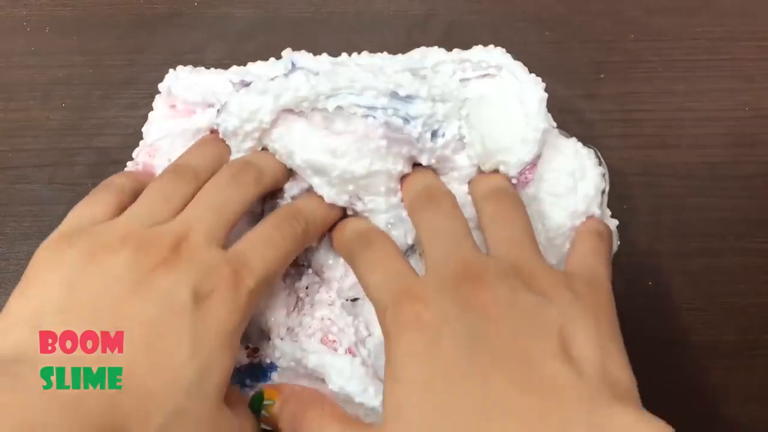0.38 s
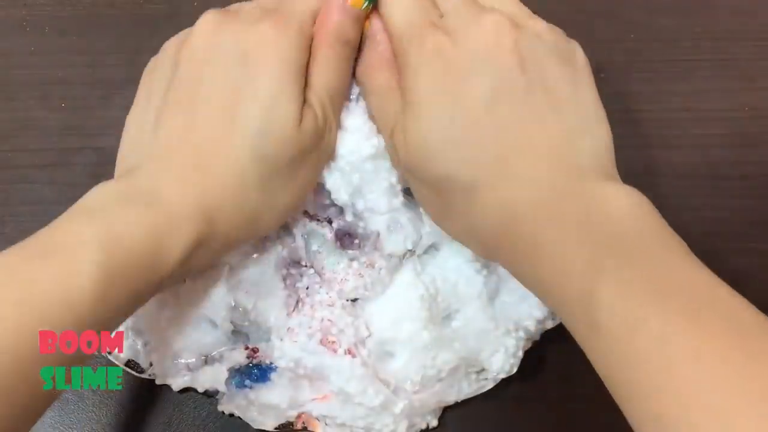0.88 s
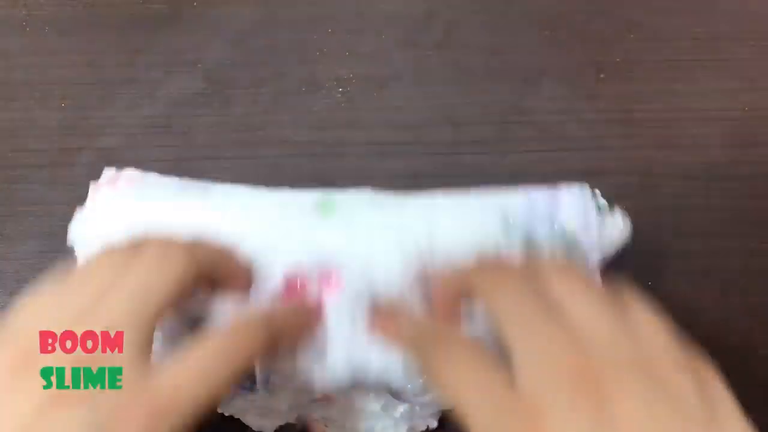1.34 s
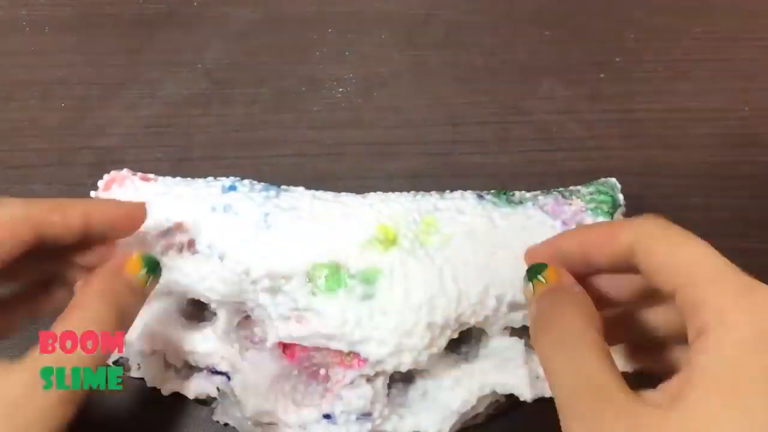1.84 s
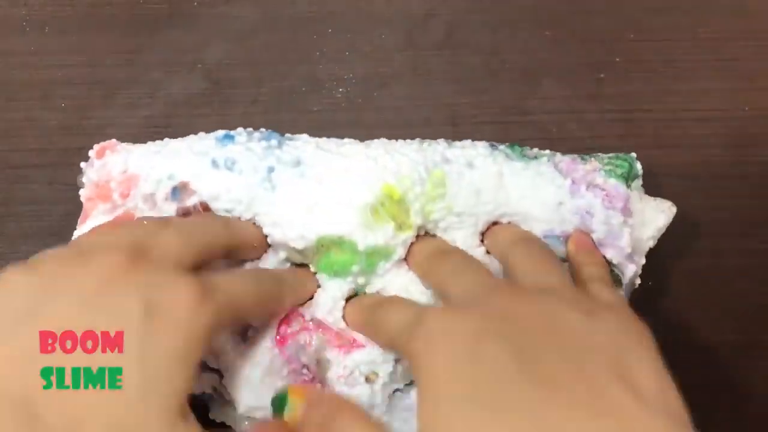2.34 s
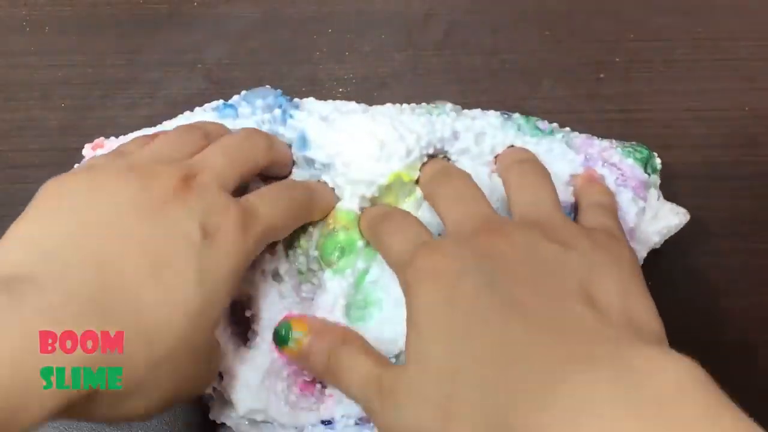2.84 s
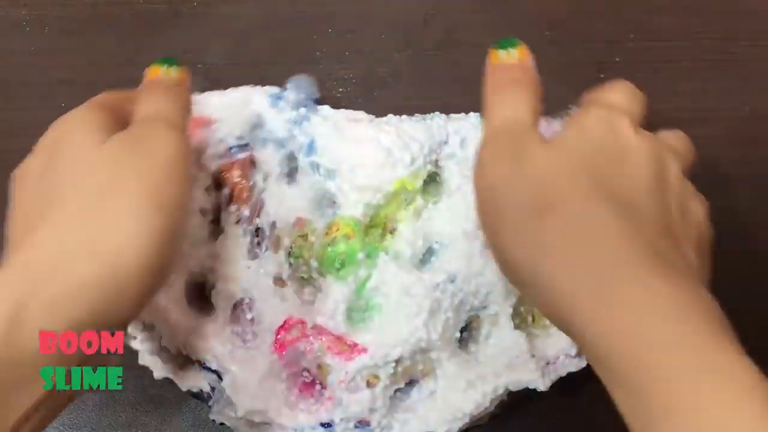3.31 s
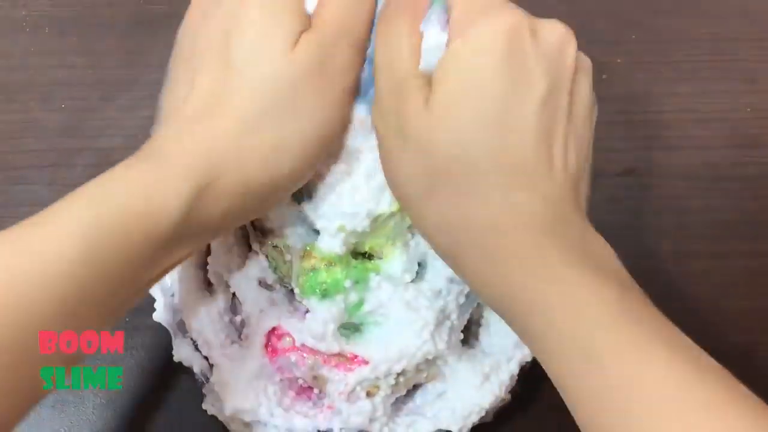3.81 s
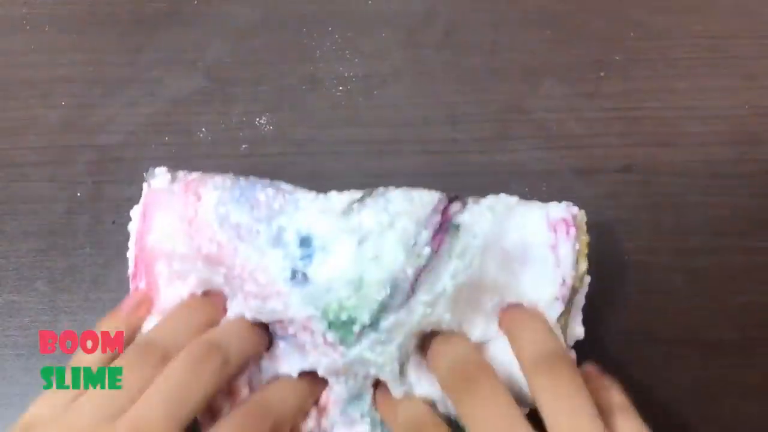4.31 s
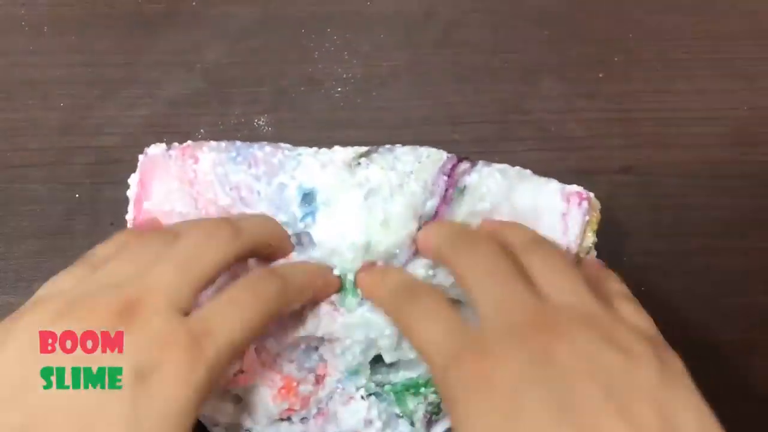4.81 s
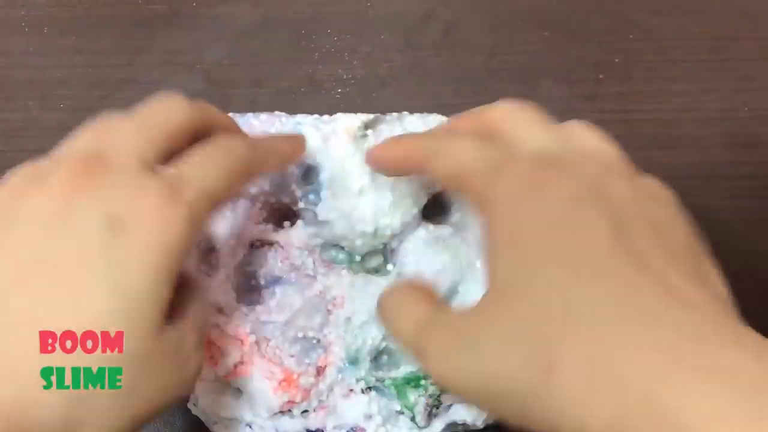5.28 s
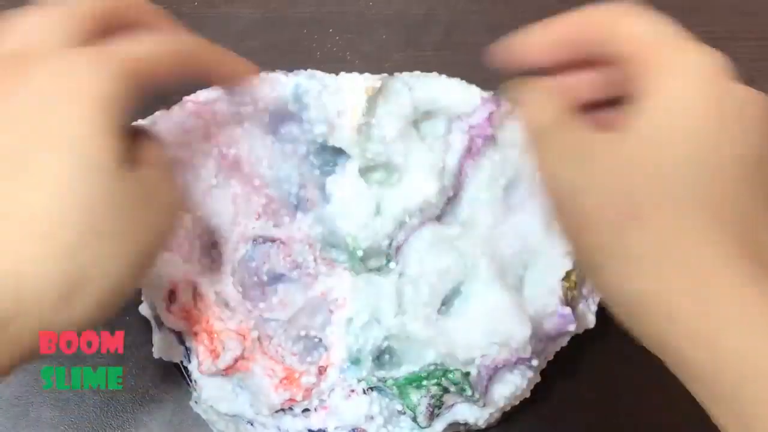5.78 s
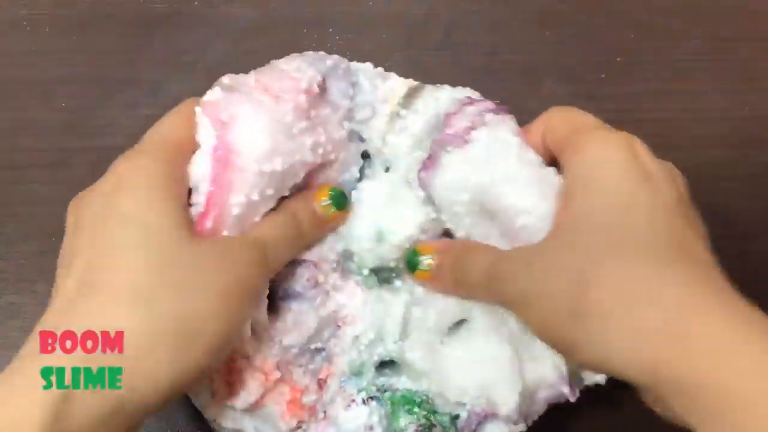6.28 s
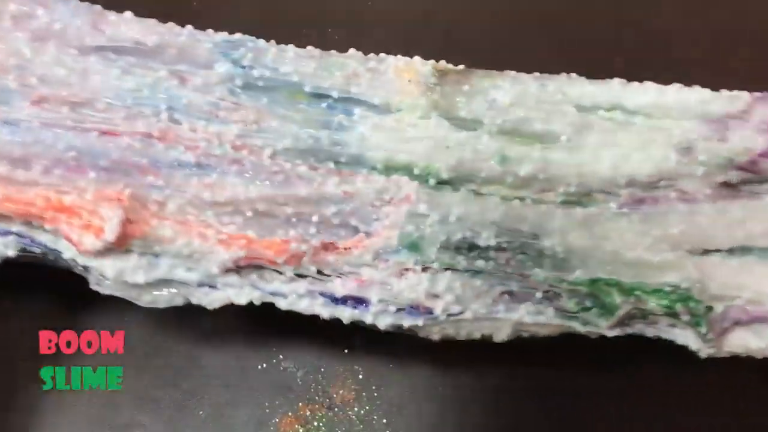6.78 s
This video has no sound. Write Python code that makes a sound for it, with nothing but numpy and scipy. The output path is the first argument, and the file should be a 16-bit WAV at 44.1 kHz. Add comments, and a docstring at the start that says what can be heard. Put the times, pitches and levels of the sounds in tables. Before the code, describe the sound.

Hands press, fold and stretch bead-filled slime on a wooden table, with wet crackles, small pops and two loud sharp bursts.

```python
"""A small room, a wooden table: two hands press, fold and stretch a slime full of foam beads.
Air pockets burst as pops: a noisy snap plus a short, damped ring. Squelch and bead crackle are clumped
random clicks through short resonances, their level following presses, slaps and pulls.
The table top hums and thumps in ringing modes; slime sounds reverberate in noise bands; air hisses under all."""
import sys
import numpy as np
from scipy import signal
from scipy.fft import rfft, irfft
from scipy.io import wavfile

SR = 44100
rng = np.random.default_rng(int(sys.argv[2]) if len(sys.argv) > 2 else 0)


def volts_from_decibels(level):
    """Turn decibel levels (scalar or array-like) into linear amplitude factors."""
    exponent = np.asarray(level, float) / 20
    return 10 ** exponent


def inscribe(sig):
    """Save sig as 16-bit PCM at rate SR to the path in sys.argv[1].

    A 1-D sig is mono; a 2-D sig holds one channel per row.
    Samples are clipped to [-1, 1] before scaling.
    """
    pcm = np.round(np.clip(np.atleast_2d(sig).T, -1, 1) * 32767)
    wavfile.write(sys.argv[1], SR, pcm.astype(np.int16))


N = 314433

# air spectrum, relative: f/Hz, density/dB
AIR_COLOUR = [(18, -24), (30, 7), (109, 7), (227, -10), (801, -32), (1280, -18.5), (4000, -42.5),
              (9000, -38), (15500, -35.5)]
# hands leaning on the table set it humming: t/s, level/dB
HUM_CURVE = [(0.0, -53), (0.44, -49.5), (1.07, -46.5), (1.27, -59), (3.1, -48.5), (3.22, -42.5),
             (4.05, -52.5), (4.91, -48.5), (5.6, -52), (5.84, -48), (6.08, -39), (6.3, -44), (6.79, -56),
             (7.13, -57.5)]
# fingers striking through to the table: t/s, relative level/dB, hardness/dB (gain of the upper modes)
THUMPS = [(0.076, -32.5, -1.5), (0.584, -26.5, -6.5), (0.872, -27, -12), (0.898, -35.5, -23),
          (1.869, -36.5, -17), (2.499, -42, -18), (3.05, -34, -8), (3.147, -26, -32), (3.198, -35.5, -21.5),
          (3.299, -30, -2), (3.987, -50.5, -4), (4.406, -36, -3), (4.701, -33, -5.5), (4.748, -31.5, -11.5),
          (5.269, -34, 0.5), (5.476, -49, -5.5), (5.703, -40.5, -3), (5.831, -39, 0), (5.952, -25.5, -8.5),
          (6.013, -27, -1), (6.039, -28.5, 2.5), (6.109, -32, 1)]
# table-top modes: f/Hz, stirred relative level/dB, struck relative level/dB, stirred t60/s
TABLE_MODES = [(63, -2, -46, 0.9), (70, -16.5, -18.5, 0.83), (92.6, 0, 3, .5), (111.78, 6, -3, 0.99),
               (146, -4, -5, 0.25), (181.7, -10, -14, 0.53), (288, -14.5, -3.5, 0.12),
               (328.5, -14.5, -4, 0.48), (403, -24, -7.5, 0.27), (458, -22, -10, 0.39)]
# fingertips sink in and stop: t/s, hold/s, squelch level/dB, bead crackle level/dB
PRESSES = [(0.053, 0.03, -45, -46), (1.864, .088, -52.5, -47.5), (2.481, 0.044, -48.5, -47.5),
           (3.046, 0.047, -46.5, -47), (4.678, 0.051, -47.5, -44.5), (5.272, 0.038, -43, -45),
           (5.853, 0.038, -49, -46), (6.393, 0.063, -47.5, -50)]
# a hand or a flap of slime lands at once: t/s, hold/s, squelch level/dB, bead crackle level/dB
SLAPS = [(0.579, 0.016, -40.5, -41), (0.875, 0.046, -53, -60.5), (3.297, 0.019, -48, -79.5),
         (5.827, 0.011, -40, -40), (6.012, 0.032, -46.5, -72)]
# mass pulled or folded, a swell: peak t/s, squelch 10 dB rise/s, 10 dB fall/s (both at least 0.01),
# squelch level/dB, bead crackle level/dB
PULLS = [(0.3, .1, .1, -55, -59), (0.372, -0.6, 0.17, -61.5, -55.5), (0.96, 0.02, .05, -51, -47.5),
         (1.1, 0.0453, -0.04, -47.5, -40), (1.22, 0.14, 0.19, -50, -40.5), (1.37, .2, -0.2, -58, -43.5),
         (1.51, 1, 0.15, -60.5, -67), (1.714, 0.27, -0.07, -56, -51.5), (2.2, .08, .2, -65.5, -54.5),
         (2.33, 0.28, 0.04, -57, -56), (2.844, 0.23, 0.24, -59, -56), (3.38, .03, 0.5, -55, -53.5),
         (3.429, .04, 0.17, -45.5, -48), (3.73, 0.11, 0.09, -54.5, -50), (3.85, 0.0442, 0.05, -47.5, -33.5),
         (4.046, 0.13, 0.17, -51.5, -44), (4.33, 0.5, 0.1, -60.5, -62), (4.517, 0, -0.11, -49, -50),
         (4.994, 0.1, 0.15, -62, -55), (5.1, -0.4, -0.2, -59, -63), (5.68, 0.3, .05, -63, -64),
         (6.105, -0.03, 0.1, -47.5, -53), (6.178, 0.0462, 0.11, -45, -50), (6.74, 0.34, 0.09, -63, -55.5),
         (7.0, 2.7, 0.5, -68, -66.5)]
# squelch grain colour, relative: f/Hz, level/dB
SQUELCH_COLOUR = [(300, -6), (600, -2), (900, -1), (1600, 7.5), (3600, 8), (7000, 1.5)]
# bead grain colour, relative: f/Hz, level/dB
BEAD_COLOUR = [(2500, -25), (5000, 9), (8000, 5), (11500, -9.5), (14500, 19)]
# bursting pockets: t/s, peak level/dB, pocket f/Hz, snap level against the pocket/dB
POPS = [(0.05, -23.5, 11100, -13), (0.2488, -30.5, 15370, -10), (0.2599, -30, 15160, -12),
        (0.2851, -31, 12900, -18), (0.2985, -31.5, 2830, -5), (0.355, -19.5, 4360, 10),
        (0.3693, -17, 4250, 10), (0.3986, -19.5, 14340, -23), (0.5684, -19, 13090, -13),
        (0.576, -7.5, 13900, -8), (0.5827, -11.5, 6130, -14), (0.586, -16, 2050, -29),
        (0.8718, -32.5, 665, -17), (0.8961, -31, 580, -19), (0.9456, -24.5, 5160, 5),
        (0.9523, -21, 10300, -2), (1.026, -18.5, 10900, -4), (1.0484, -18, 15500, 3),
        (1.0517, -13.5, 9500, -1), (1.0712, -12.5, 1650, -1), (1.0725, -11.5, 2740, -10),
        (1.106, -25, 14100, -6), (1.1146, -5, 9130, -7), (1.1173, 3, 3940, 5.5), (1.1184, -24, 603, -24),
        (1.1205, -9.5, 6400, -2), (1.121, -27, 2380, 1.5), (1.1302, -16.5, 3050, -5),
        (1.373, -23, 13600, -2), (1.612, -26, 15000, 8), (1.6598, -25, 10210, 24), (1.6988, -26, 14510, 13),
        (1.703, -15, 10840, -0.5), (1.849, -28.5, 14400, -1), (2.1049, -36, 12600, -7),
        (2.1223, -26.5, 14510, -6), (2.1521, -22.5, 3650, 4.5), (2.1727, -28, 13870, -6),
        (2.2507, -33, 14000, -14), (2.3327, -32, 5860, 7), (2.6594, -33, 10900, -25),
        (2.7332, -31.5, 6840, 2), (2.826, -38, 2300, -6), (2.8618, -36, 2960, -11),
        (2.8832, -38.5, 6200, -10), (2.9138, -37.5, 9690, -1), (3.022, -36, 3900, -9),
        (3.1463, -31, 2000, 1), (3.6738, -21.5, 1890, -11), (3.676, -25.5, 680, -20),
        (3.733, -29, 2400, -4), (3.74, -2, 3560, -4.5), (3.7415, -23.5, 640, -21), (3.7418, -7, 4520, -9.5),
        (3.745, -13.5, 4570, -10.5), (3.753, -22, 3300, -8), (3.7749, -15.5, 10940, -2),
        (3.8191, -4, 11900, -28), (3.837, -21, 15590, -6), (3.8671, -13.5, 7150, -3),
        (4.3623, -20, 7560, -9), (4.4073, -32, 527, -31), (4.4264, -18, 15100, -1), (4.4335, -34, 3500, -8),
        (4.4651, -26, 13520, 15), (4.8708, -38, 14210, -9), (4.8943, -38, 11000, -6),
        (4.9135, -32.5, 9400, -22), (4.9538, -34, 14080, -4), (4.9716, -30.5, 14400, -12),
        (5.009, -27.5, 7500, 2.5), (5.043, -23.5, 13860, 2), (5.1038, -30.5, 13000, -3),
        (5.5812, -25, 15300, -20), (5.6287, -33.5, 12000, -4.5), (5.6634, -31.5, 9600, 6),
        (5.6787, -34, 15100, -7), (5.7105, -32, 573, -26), (5.7752, -35, 14690, 8),
        (5.8302, -22.5, 14700, 9), (5.832, -24, 3660, -4), (5.9525, -28, 1120, -33),
        (6.011, -30.5, 480, -20), (6.0994, -34, 4100, 15), (6.148, -31, 4500, -12), (6.18, -24, 14600, -6),
        (6.3547, -34.5, 9600, 0), (6.4173, -28, 11000, 7), (6.4922, -32, 6800, 0), (6.5254, -29, 4550, -16),
        (6.6502, -32, 3070, 14), (6.8504, -38, 3800, 3), (6.923, -35.5, 14040, -13)]
# room reverberation: f/Hz, t60/s, relative level/dB
ROOM_BANDS = [(307, 0.49, -13), (775, 0.8, -18.5), (2000, .75, -22.5), (4140, 0.94, -23.5),
              (7800, 0.78, -24), (13000, 0.091, -18)]
# narrow dips in the microphone's response: f/Hz, width/Hz, gain/dB
MIC_DIPS = [(5400, 400, -4), (8500, 800, -3.5), (11500, 700, -6)]


def rms_one(x):
    """Scale to rms 1."""
    return x / np.sqrt(np.mean(x ** 2) + 1e-20)


def at_hz(points, hz, column=1):
    """Read a table column on a log-frequency axis."""
    points = np.array(points)
    return np.interp(np.log(hz), np.log(points[:, 0]), points[:, column])


def in_time(rows):
    """Columns of a curve, one value per sample."""
    t_s, *columns = np.transpose(rows)
    return [np.interp(np.arange(N) / SR, t_s, column) for column in columns]


def drift(rate_hz):
    """Slow random wander of rms 1: noise through two equal poles."""
    r = np.exp(-2 * np.pi * rate_hz / SR)
    wander = signal.lfilter([1], [1, -2 * r, r * r], rng.standard_normal(N + SR))
    return rms_one(wander[SR:])


def ring(x, hz, t60_s):
    """Resonator: a unit click rings at height about 1; no steady push passes."""
    r = volts_from_decibels(-60 / (t60_s * SR))
    w = 2 * np.pi * min(hz, .45 * SR) / SR
    return signal.lfilter([.5, 0, -.5], [1, -2 * r * np.cos(w), r * r], x + 1e-18)


def air():
    """Quiet hiss and rumble of room and microphone: noise shaped in frequency."""
    level_db = -52.5
    hz = np.maximum(np.arange(N // 2 + 1) * SR / N, 1)
    spectrum = rfft(rng.standard_normal(N)) * volts_from_decibels(at_hz(AIR_COLOUR, hz))
    return volts_from_decibels(level_db) * rms_one(irfft(spectrum, N))


def table(hum_db):
    """Modes stirred by the hands and struck by thumps; hard thumps reach the upper modes."""
    thump_db, hard_above_hz, luck_db = -6, 230, 3.73
    t_s, level_db, hard_db = np.transpose(THUMPS)
    luck = rng.normal(0, luck_db, (len(t_s), len(TABLE_MODES)))
    stirred, struck = 0, 0
    for k, (hz, stirred_db, struck_db, t60_s) in enumerate(TABLE_MODES):
        stir = ring(rng.standard_normal(N + SR), hz, t60_s)[SR:]
        stirred = stirred + volts_from_decibels(stirred_db) * rms_one(stir)
        blow_db = level_db + struck_db + thump_db + hard_db * (hz > hard_above_hz) + luck[:, k]
        blows = np.zeros(N)
        blows[(t_s * SR).astype(int)] = volts_from_decibels(blow_db)
        padded_finger = signal.butter(2, 1.17 * hz, fs=SR)    # gives no click
        struck = struck + signal.lfilter(*padded_finger, ring(blows, hz, .5 * t60_s))
    return volts_from_decibels(hum_db) * rms_one(stirred) + struck


def peak(start_s, stop_s, rise_db_per_s, fall_db_per_s):
    """dB under the top, once a ms: rises to start, holds, falls after stop."""
    t_s = np.arange(0, N / SR + 1, 1 / 1000)
    rise = rise_db_per_s * (t_s - start_s)
    fall = fall_db_per_s * (stop_s - t_s)
    return np.minimum(0, np.minimum(rise, fall))


def kneading():
    """Gains of squelch, beads and the beads' pulls alone; overlapping moves add in power."""
    rest_squelch_db, rest_bead_db = -75, -84
    press_rise_db_per_s, slap_rise_db_per_s, fall_db_per_s = 500, 2500, 600
    ooze_db, ooze_fall_db_per_s = -13.5, 110    # the dent closes slowly
    bead_swing = 1.26    # beads start and stop more abruptly than the squelch
    squelch_power, pressed_power, pulled_power = volts_from_decibels(2 * rest_squelch_db), 0, volts_from_decibels(2 * rest_bead_db)
    touches = [(press_rise_db_per_s, *row) for row in PRESSES]
    touches += [(slap_rise_db_per_s, *row) for row in SLAPS]
    for rise, s, hold_s, squelch_db, bead_db in touches:
        shape = peak(s, s + hold_s, rise, fall_db_per_s)
        ooze = ooze_db + peak(s, s + hold_s, rise, ooze_fall_db_per_s)
        squelch_power = squelch_power + volts_from_decibels(2 * (squelch_db + np.maximum(shape, ooze)))
        pressed_power = pressed_power + volts_from_decibels(2 * (bead_db + bead_swing * shape))
    for s, rise_s, fall_s, squelch_db, bead_db in PULLS:
        shape = peak(s, s, 10 / max(rise_s, .01), 10 / max(fall_s, .01))
        squelch_power = squelch_power + volts_from_decibels(2 * (squelch_db + shape))
        pulled_power = pulled_power + volts_from_decibels(2 * (bead_db + bead_swing * shape))
    ms = 1000 * np.arange(N) / SR
    powers = (squelch_power, pressed_power + pulled_power, pulled_power)
    return [np.interp(ms, np.arange(len(p)), np.sqrt(p)) for p in powers]


def grains(median_per_s, clump_db, t60_cycles, colour, count=14):
    """Clumped random clicks of uneven size, dealt to short resonances along a colour; rms 1."""
    size_db = np.minimum(rng.exponential(1, N), 4)
    sizes = volts_from_decibels(size_db) * rng.choice([-1, 1], N)
    born = rng.random(N) < median_per_s * volts_from_decibels(clump_db * drift(30)) / SR
    dealt = rng.integers(0, count, N)
    total = 0
    for k, hz in enumerate(np.geomspace(colour[0][0], colour[-1][0], count)):
        clicks = sizes * born * (dealt == k)
        total = total + volts_from_decibels(at_hz(colour, hz)) * ring(clicks, hz, t60_cycles / hz)
    return rms_one(total)


def squelch(gain):
    """Wet mass: dense, strongly clumped grains that ring for several cycles."""
    return gain * grains(median_per_s=6100, clump_db=5.5, t60_cycles=8.0, colour=SQUELCH_COLOUR)


def beads(gain):
    """Beads crackle apart: denser, drier and higher grains."""
    return gain * grains(median_per_s=10000, clump_db=3.0, t60_cycles=2.5, colour=BEAD_COLOUR)


def tiny_pops(pull, count=360):
    """Rows as in POPS at random times, louder the harder the pull; most are small and high."""
    over_db, follows, spread_db, snap_db = -2.5, .75, 4, -3.5
    low_hz, high_hz = 3980, 15800
    when, size, pitch = rng.random((count, 3)).T
    pull_db = 20 * np.log10(pull[(when * N).astype(int)])
    level_db = follows * pull_db + over_db - spread_db * np.log(size + .05)
    hz = high_hz - pitch ** 2 * (high_hz - low_hz)
    return [(w * N / SR, db, f, snap_db) for w, db, f in zip(when, level_db, hz)]


def pops(rows):
    """A film snaps in a fraction of a ms, the pocket rings a few cycles, the torn film sputters on."""
    burst_ms, tear_db, tear_ms, lag_ms = 0.59, -20, 5.8, 1.0    # times are e-fold constants
    snap_hz, snap_reach, soft, soggy_hz, pocket_cycles = 2500, 4.0, 3.6, 400, 5.5
    length = 2048
    out, ms = np.zeros(N + length), 1000 * np.arange(length) / SR
    noise = rng.standard_normal((len(rows), 2, length))
    for (s, db, hz, snap_db), (hiss, lumps) in zip(rows, noise):
        sputter = volts_from_decibels(tear_db) * np.abs(lumps) * np.exp(-ms / tear_ms) * -np.expm1(-ms / lag_ms)
        push = hiss * (.5 * np.exp(-ms / burst_ms) + sputter)
        push[0] = 1
        # big pockets open softly
        slow = signal.lfilter(*signal.butter(2, min(soft * hz, .45 * SR), fs=SR), push)
        # wet walls damp the big pockets
        pocket = ring(slow, hz, pocket_cycles / (hz + soggy_hz))
        # big pockets snap duller
        edges_hz = [min(hz, snap_hz), min(snap_reach * hz, .4 * SR)]
        snap = signal.lfilter(*signal.butter(1, edges_hz, "band", fs=SR), push)
        pop = pocket / np.abs(pocket).max() + volts_from_decibels(snap_db) * snap / np.abs(snap).max()
        start = round(s * SR)
        out[start:start + length] += volts_from_decibels(db) * pop / np.abs(pop).max()
    return out[:N]


def room(x):
    """Diffuse reflections: noise bands, each dying at its own rate."""
    onset_ms, level_db = 10.0, -22.5
    t_s, tail = np.arange(SR) / SR, 0
    edges_hz = 200 * 2 ** np.arange(0, 6.6, .5)
    for low, high in zip(edges_hz, edges_hz[1:]):
        hz = np.sqrt(low * high)
        band_pass = signal.butter(2, [low, high], "band", fs=SR, output="sos")
        band = signal.sosfilt(band_pass, rng.standard_normal(SR))
        decay_db = -60 * t_s / at_hz(ROOM_BANDS, hz)
        tail = tail + band * volts_from_decibels(at_hz(ROOM_BANDS, hz, column=2) + level_db + decay_db)
    onset = -np.expm1(-1000 * t_s / onset_ms)
    return signal.fftconvolve(x, tail * onset)[:N]


def dip(x, hz, width_hz, gain_db):
    """Take part of a narrow band away."""
    band = signal.lfilter(*signal.iirpeak(hz, hz / width_hz, fs=SR), x)
    return x - (1 - volts_from_decibels(gain_db)) * band


def scene():
    """Slime and its reverberation, table and air."""
    squelch_gain, bead_gain, pull = kneading()
    slime = squelch(squelch_gain) + beads(bead_gain) + pops(POPS + tiny_pops(pull))
    mix = slime + room(slime) + table(*in_time(HUM_CURVE)) + air()
    return mix[None]


def band_limit(x):
    """A steep low-pass at the top of the band."""
    return signal.sosfilt(signal.butter(12, 17150, fs=SR, output="sos"), x)


def record(dry):
    """Bass rolls off, narrow bands dip, the highest peaks clip, the top is cut."""
    x = signal.sosfilt(signal.butter(4, 52, "high", fs=SR, output="sos"), dry)
    for row in MIC_DIPS:
        x = dip(x, *row)
    x = np.clip(x, -.82, .82)
    top_cut = signal.cheby2(14, 34, 16080, fs=SR, output="sos")    # 34 dB down from 16080 Hz up
    x = signal.sosfilt(top_cut, x)
    return band_limit(x)


dry = scene()
out = record(dry)
inscribe(out)
```